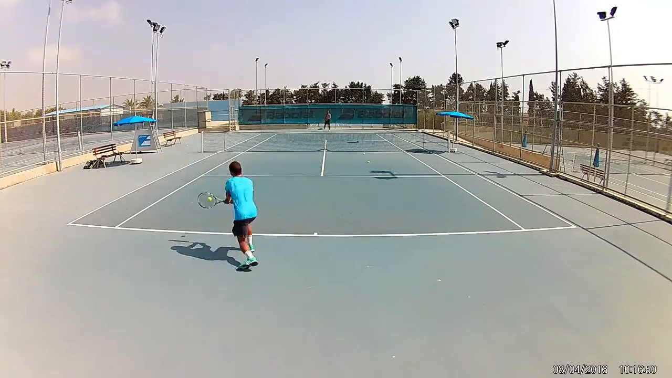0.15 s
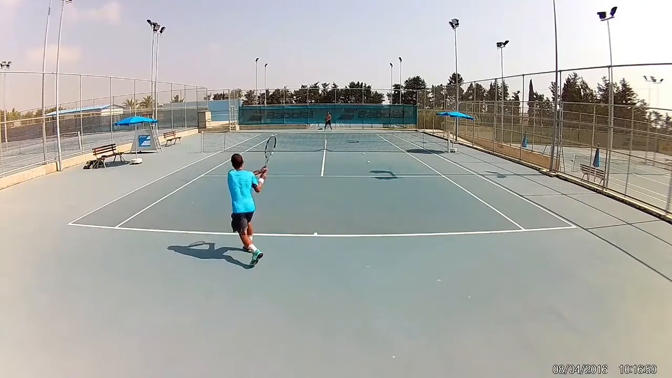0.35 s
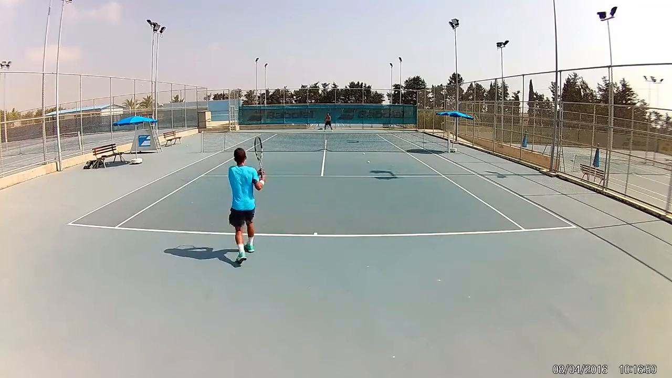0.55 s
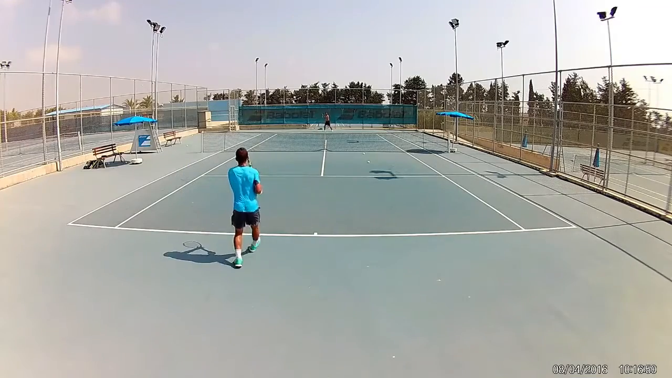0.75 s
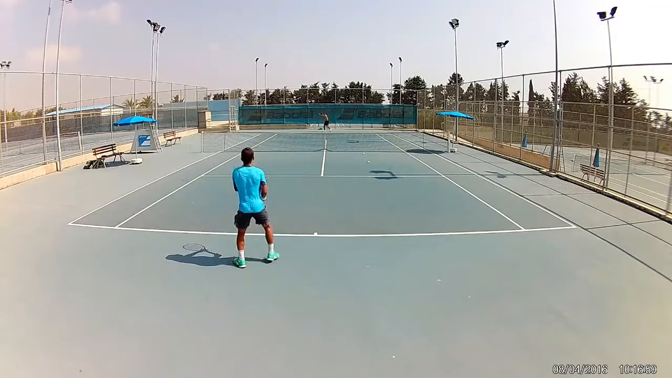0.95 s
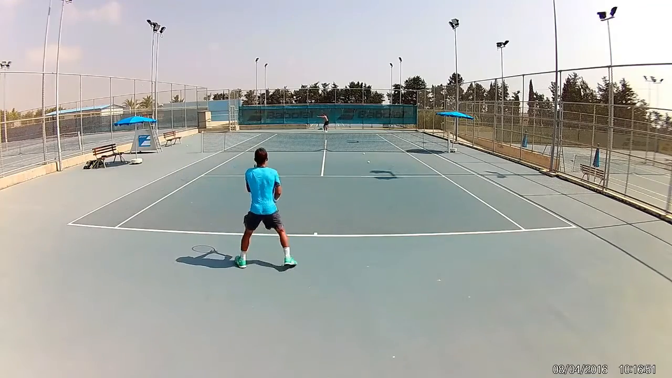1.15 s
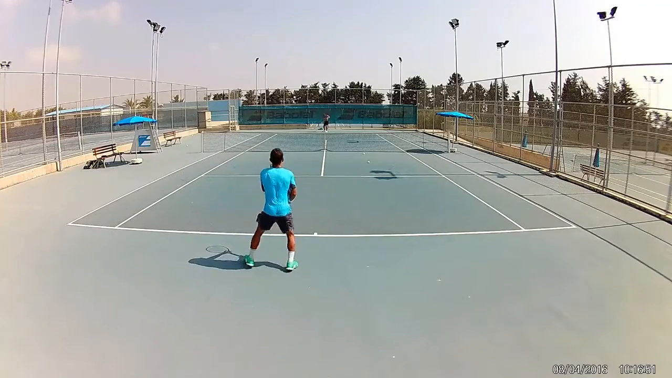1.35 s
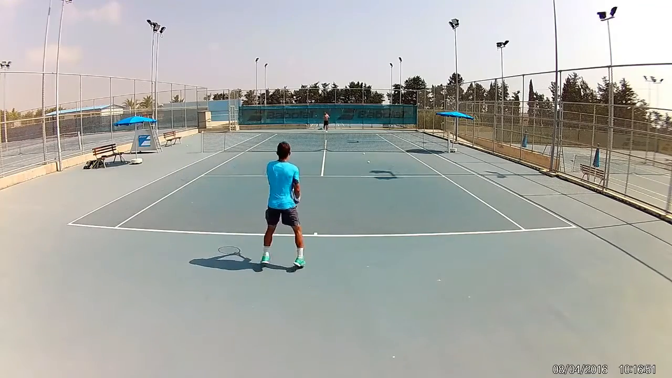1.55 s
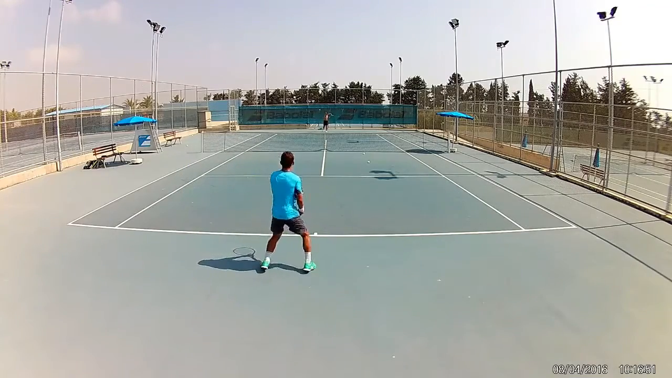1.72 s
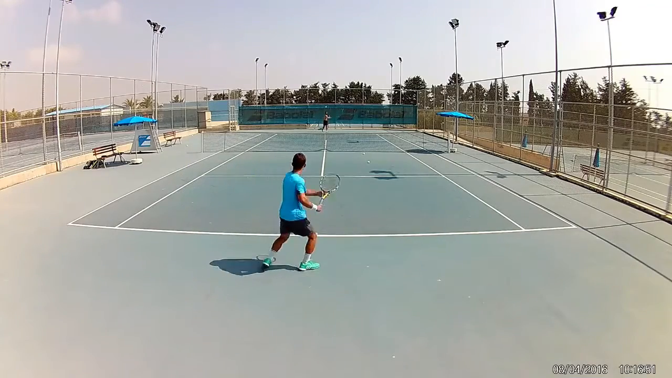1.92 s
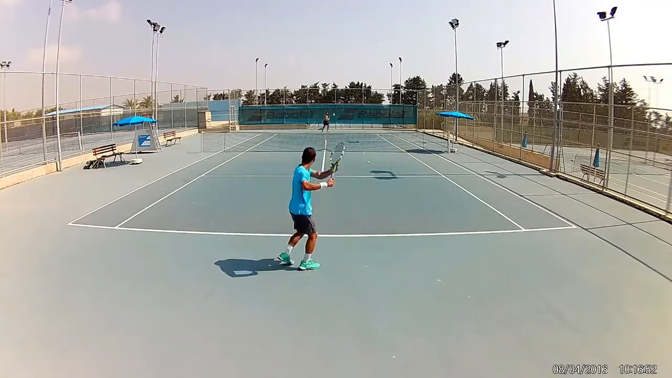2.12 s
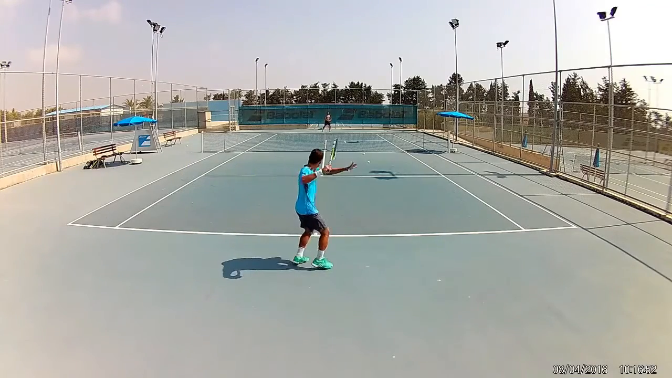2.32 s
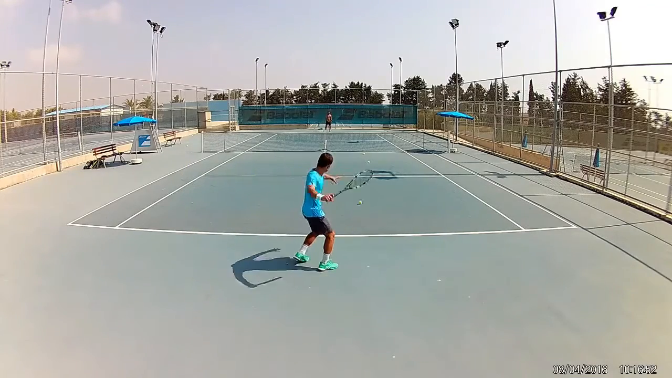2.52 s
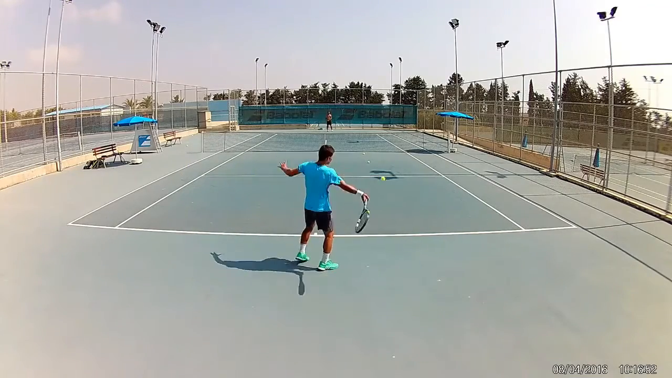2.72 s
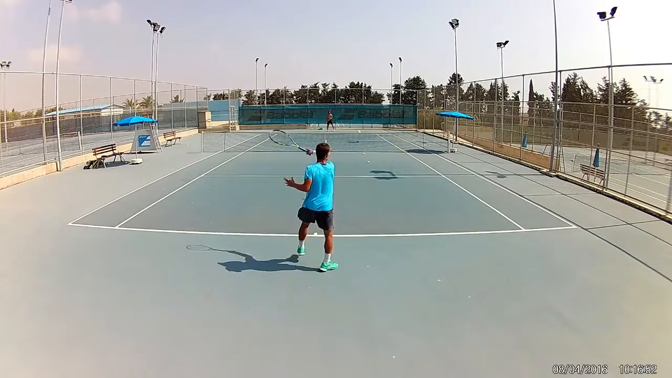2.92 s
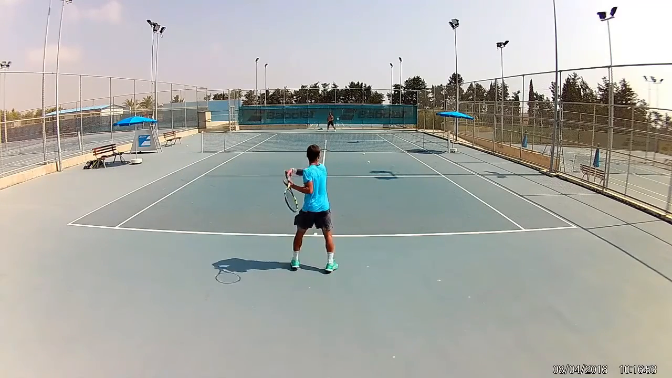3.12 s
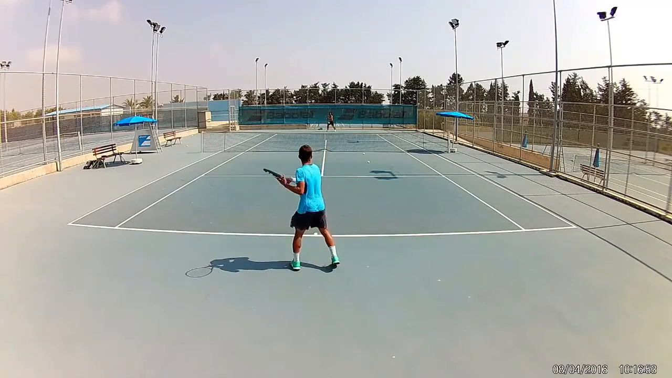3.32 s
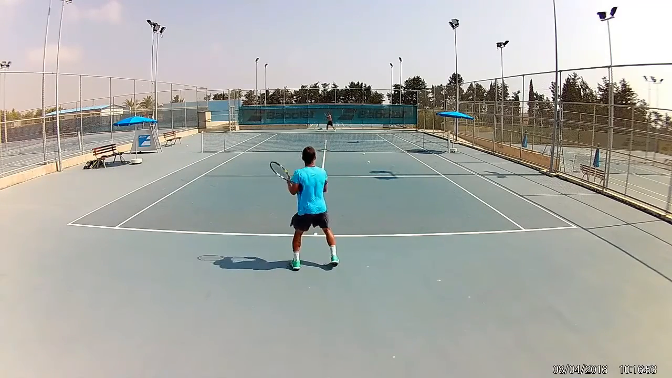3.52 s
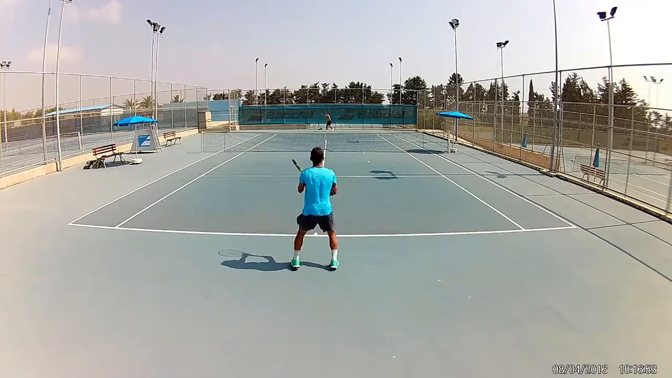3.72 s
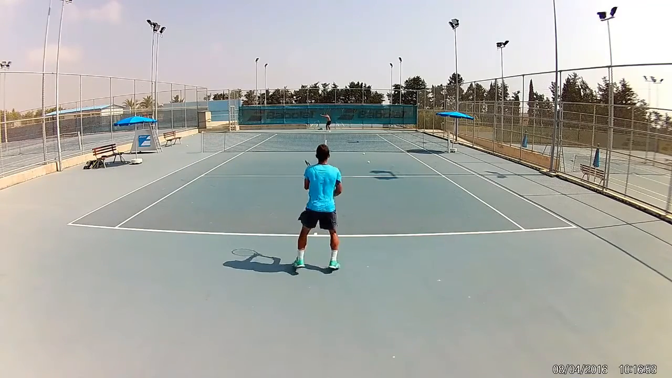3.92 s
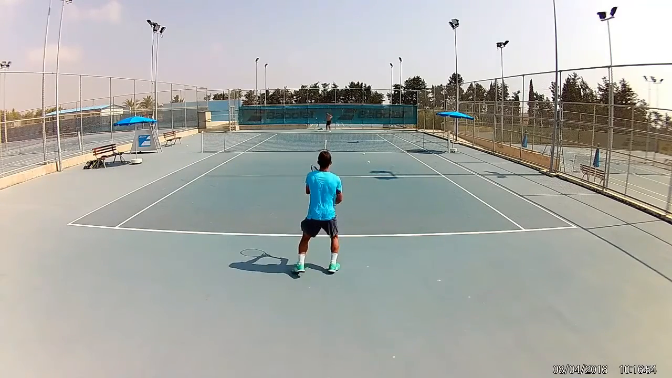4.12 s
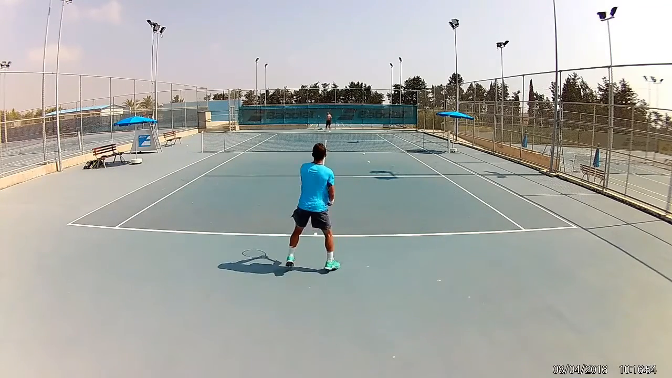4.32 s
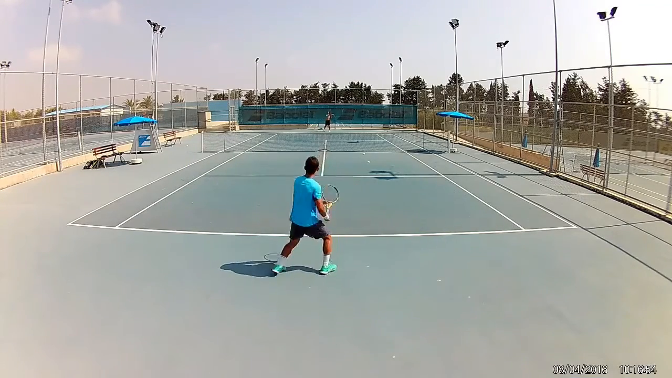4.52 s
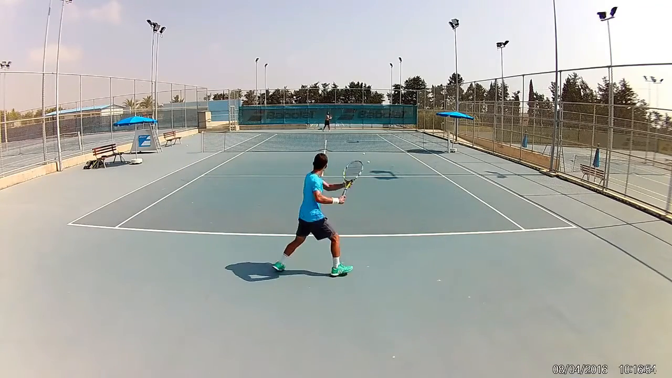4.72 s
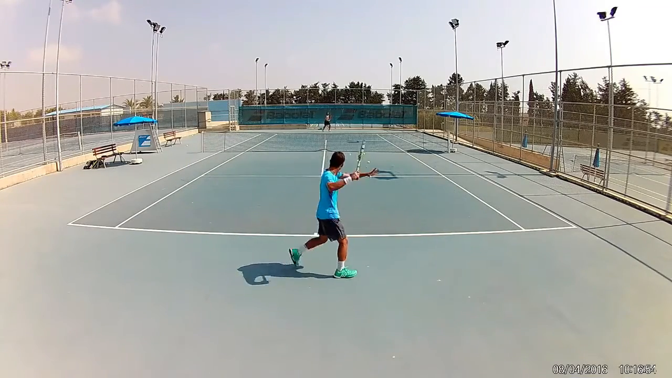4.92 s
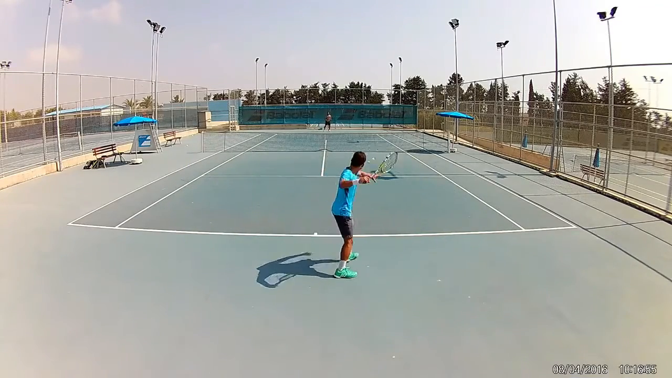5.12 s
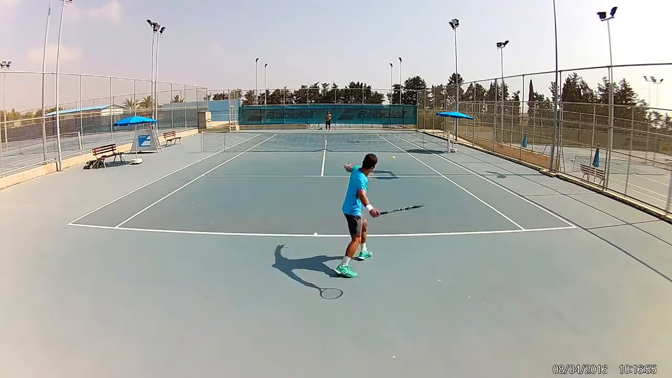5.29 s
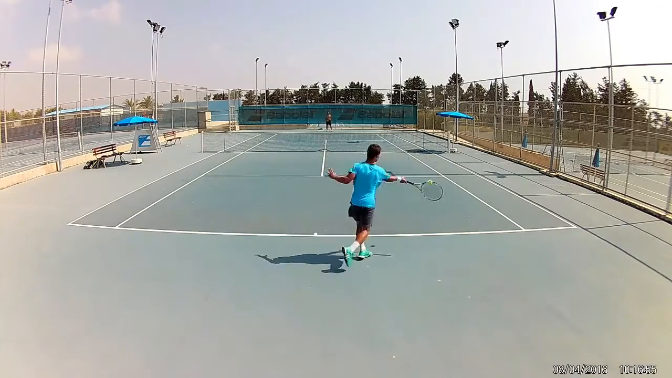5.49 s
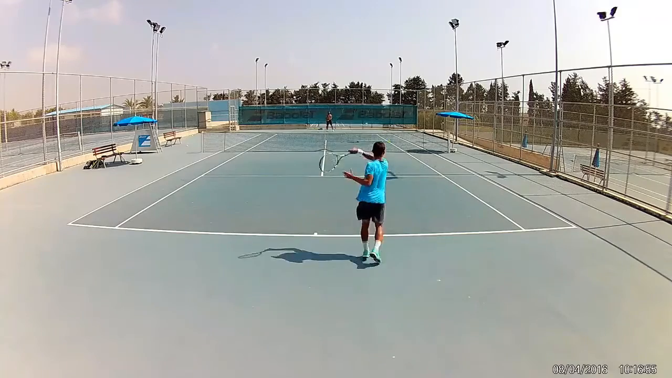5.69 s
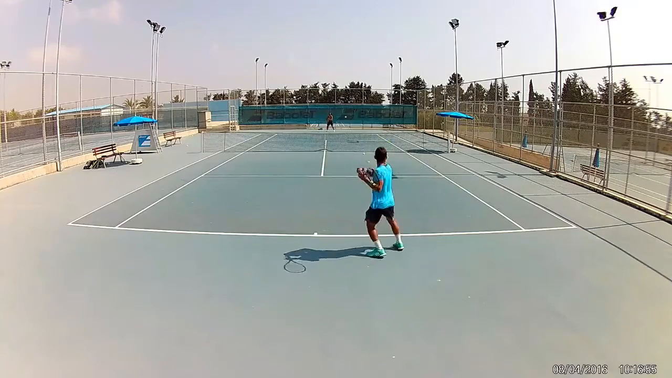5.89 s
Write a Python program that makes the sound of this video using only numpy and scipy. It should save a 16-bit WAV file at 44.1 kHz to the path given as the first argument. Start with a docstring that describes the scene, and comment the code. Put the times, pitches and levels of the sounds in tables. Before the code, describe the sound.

Rackets pop a tennis ball back and forth, close then distant, with bounces, faint shoe scuffs and wind on the microphone.

```python
"""A tennis rally on an outdoor hard court, heard from behind the near baseline.
Wind rumbles on a small hissing microphone; a shoe lands and scuffs, and the near player strikes.
The racket thumps, its strings ping, the hollow ball pops, and the ground and back wall reflect the sound.
The far player answers, duller with distance; the wind eases, shoes squeak and the ball bounces close by.
Three more strokes follow, near, far and near, with a second bounce before the last as the wind rises."""
import sys
import numpy as np
from scipy import signal
from scipy.fft import rfft, irfft
from scipy.io import wavfile
from scipy.ndimage import uniform_filter1d

SR = 44100
rng = np.random.default_rng(int(sys.argv[2]) if len(sys.argv) > 2 else 0)


def unload_wav(signal):
    """Save mono or channel-first audio to the path in sys.argv[1] as 16-bit WAV at rate SR, clipped to [-1, 1]."""
    wavfile.write(
        sys.argv[1],
        SR,
        np.round(np.clip(np.atleast_2d(signal).T, -1, 1) * 32767).astype(np.int16),
    )


N = 262395
T = np.arange(SR // 2) / SR  # time since an impact, t/s

NEAR_M, FAR_M = 5.7, 31  # from the microphone to the two baselines
# pairs: (at the near baseline, at the far baseline)
CRACK_DB, GROUND_DB, WALL_DB, COURT_DB = (-15, -30), (4.5, -16), (-17.5, -1.1), (-4.5, 0)
CUTOFF_HZ, WALL_DELAY_MS = (11500, 6400), (37.7, 39.2)

# racket impacts, near and far in turn: t/s, level/dB, distance/m, thump f/Hz, dwell t/ms, ball f/Hz,
# ball level/dB, string frequency ratio, string level/dB, tick f/Hz, tick level/dB, ground delay t/ms,
# lingering level/dB
RACKET_IMPACTS = [ (0.3484, -16, 7.1, 248, 5.6, 828, 7, 0.92, 0.5, 6430, -25.5, 1.25, 9),
                  (1.728, -16, 28.2, 456, 3.67, 1016, 3.5, .92, -16.5, 6330, -42, 4.1, -18),
                  (2.9675, -13.5, 5.26, 360, 3.21, 759, 4, .97, -5, 4260, -23.5, 2.85, 3),
                  (4.4683, -21.5, 29.6, 405, 2.99, 876, 5.5, 1.028, -4.5, 6300, -40, 2.43, -6),
                  (5.7260, -14.5, 5.46, 395, 3.2, 780, 4, 1.032, -0.5, 9700, -36.5, 2.263, 7.5)]

def strokes():
    """Impact excitation: the racket sounds, then the ball; far strokes are duller, with more wall echo."""
    out = np.zeros(N)
    for (start, db, metres, thump_hz, dwell_ms, ball_hz, ball_db, pitch, strings_db,
         tick_hz, tick_db, ground_ms, ring_db) in RACKET_IMPACTS:
        crack_db, ground_db, wall_db, wall_ms, court_db, cutoff_hz = (
            at_distance(metres, pair)
            for pair in (CRACK_DB, GROUND_DB, WALL_DB, WALL_DELAY_MS, COURT_DB, CUTOFF_HZ))
        racket = thump(thump_hz) + amp(strings_db) * strings(pitch)
        ball = amp(ball_db) * late(pop(ball_hz, t60=0.017, rise_s=0.00071), dwell_ms)
        body = racket + ball
        ground = amp(ground_db) * late(body, ground_ms)
        direct = body + ground + amp(crack_db) * crack() + amp(tick_db) * tick(tick_hz)
        # directivity: other directions get less of the ball's note and more of the crack
        backward = direct + amp(crack_db + 9) * band(crack(), [1200, 2800], "band")
        sideways = amp(4.5) * racket + amp(-0.5) * ball + amp(crack_db + 7.5) * crack()
        space = echoes(backward, wall_ms, wall_db) + amp(court_db) * scatter(sideways)
        ring = amp(ring_db) * lingering(ball_hz)
        add(out, start, amp(db) * band(direct + space + ring, cutoff_hz, "low"))
    return out


def thump(hz):
    """Dipole radiation: a bell-shaped contact force radiates its slope, one dip and one crest."""
    u = 2 * np.pi * hz * (T - .0022)
    return band(u * np.exp((1 - u ** 2) / 2), 175, "high")


def pop(hz, t60, rise_s):
    """Damped oscillation: a struck body rings as it springs back into shape."""
    return np.sin(2 * np.pi * hz * T) * fade(t60) * rise(rise_s)


# modes of string bed and frame: nominal f/Hz, level/dB, T60/s
RACKET_MODES = [(561, -1, 0.028), (1104, 3, 0.017), (1354, 0.5, 0.019), (1833, -8, 0.015),
                (1923, -19, 0.039), (2244, -20.5, 0.046), (2540, -23.5, 0.012), (3250, -33, 0.0066),
                (3560, -16, 0.0096)]

def strings(pitch):
    """Modal superposition: each mode, tuned by the ratio pitch, decays at its own rate."""
    modes = sum(amp(db) * np.sin(2 * np.pi * hz * pitch * T) * fade(t60) for hz, db, t60 in RACKET_MODES)
    return modes * rise(0.0012)


# spectrum of felt striking strings: f/Hz, relative level/dB
FELT_SPECTRUM = [(500, 7), (1800, 3.5), (3000, -3.5), (4100, -5.5), (5400, -17.5), (6900, -19.5),
                 (8000, -35), (9300, -29), (12000, -24.5), (15000, -33)]

def crack():
    """Contact noise: felt snaps against the strings in sharp ticks, then a duller rattle dies away."""
    ticks = amp(4 * noise([(100, 0), (900, 0), (2000, -30)], len(T)))
    snap = tint(ticks * rng.standard_normal(len(T)), FELT_SPECTRUM) * rise(0.0011) * fade(0.05)
    rattle = band(noise(FELT_SPECTRUM, len(T)), 7700, "low") * fade(0.11) * (T > .004)
    return amp(4) * snap + amp(-7.5) * rattle


def tick(hz, half_width=0.08, contact_s=0.0059):
    """Friction noise: a bright burst lasts only while the felt rubs the strings."""
    rub = rng.standard_normal(len(T))
    note = unit(band(rub, [hz * (1 - half_width), hz * (1 + half_width)], "band"))
    sparkle = unit(band(rub, [9000, 13200], "band", order=4))
    return (note + amp(-14) * sparkle) * np.sin(np.pi * np.minimum(T / contact_s, 1))


# ball landings on the near court: t/s, level/dB
LANDINGS = [(2.6902, -24.5), (5.1820, -30)]

def bounces():
    """Elastic rebound: on the hard court the ball rings higher and shorter, over a soft thud."""
    out = np.zeros(N)
    ring = pop(hz=1110, t60=0.012, rise_s=0.00051)
    direct = amp(6.5) * ring + amp(-3) * late(thump(hz=198), ms=0.81)
    slaps = echoes(ring, WALL_DELAY_MS[1], wall_db=-3)
    for start, db in LANDINGS:
        add(out, start, amp(db) * (direct + slaps + amp(-5) * scatter(direct)))
    return out


# spectrum of grit under a sole: f/Hz, relative level/dB
GRIT_SPECTRUM = [(1000, 8), (2200, 1), (3000, -4), (3700, -1), (4700, 5), (5400, -20), (7000, -7),
                 (8000, -22), (10500, -2), (14000, -25)]
# shoe scuffs and, in the last row, the final stroke's faint echo from the court's far end:
# t/s, level/dB, duration/s, grit f/Hz, squeak f/Hz, squeak level/dB
SCUFFS_AND_ECHO = [(0.253, -71.5, 0.16, 10100, 3600, -25), (0.759, -64, 0.035, 6900, 3500, -8),
                   (2.207, -53, 0.014, 2540, 3140, -16), (2.342, -50.5, 0.045, 2270, 3600, -25),
                   (2.377, -58.5, 0.025, 2200, 2670, 2), (2.514, -61, 0.026, 3460, 3600, -20),
                   (3.214, -55, 0.061, 3640, 4000, -9), (4.062, -59, 0.056, 2600, 3600, -20),
                   (5.408, -45.5, 0.033, 3460, 4100, -4), (5.427, -49.5, 0.028, 2500, 3630, 6.5),
                   (5.45, -54.5, 0.033, 2600, 3630, -2), (5.897, -62, 0.047, 4430, 4040, 0)]

def scuffs_and_echo(slip_db=3.5, pitch_spread=0.065):
    """Stick-slip friction: soles grind on grit and squeak; the last burst stands for a stroke's echo."""
    out = np.zeros(N)
    for start, db, length, grit_hz, squeak_hz, squeak_db in SCUFFS_AND_ECHO:
        push = np.sin(np.pi * np.minimum(T / length, 1) ** 0.78)
        slips = amp(slip_db * noise([(20, -14), (110, 0), (250, -6), (600, -40), (3000, -80)], len(T)))
        grains = tint(slips * rng.standard_normal(len(T)), GRIT_SPECTRUM)
        grit = unit(band(grains, [grit_hz * .5, grit_hz * 1.23], "band"))
        waver = 1 + pitch_spread * noise([(20, -10), (400, 3), (1200, -26)], len(T))
        tone = np.sin(2 * np.pi * np.cumsum(squeak_hz * waver) / SR)
        squeak = unit(band(slips * tone, 5000, "low", order=4))
        direct = push * (grit + amp(squeak_db) * squeak)
        add(out, start, amp(db) * (direct + echoes(direct, wall_ms=46, wall_db=-19)))
    return out


# footfalls: t/s, level/dB, slap level/dB
FOOTFALLS = [(0.119, -29, -33), (1.007, -46, -14), (1.295, -32.5, -20), (1.952, -32.5, -19),
             (3.648, -40, -30), (3.854, -43, -9), (4.695, -28, -29)]

def footsteps():
    """Damped impact: a shoe lands with a low thud and a slap of the sole."""
    out = np.zeros(N)
    thud = amp(7.5) * pop(hz=134, t60=0.024, rise_s=0.0029)
    for start, db, slap_db in FOOTFALLS:
        slap = unit(band(noise(COURT_SPECTRUM, len(T)), [500, 1500], "band")) * fade(0.11)
        add(out, start, amp(db) * (thud + amp(slap_db) * slap))
    return out


def echoes(x, wall_ms, wall_db):
    """Specular reflection: distinct slaps from the back wall, the side wall and the court's far end."""
    wall = amp(wall_db) * late(band(x, 11400, "low"), wall_ms)
    side = amp(-19) * late(band(x, 1070, "low"), ms=59.5)
    far_end = amp(-30) * late(x, ms=168)
    return wall + side + far_end


# spectrum of the court's scattered sound: f/Hz, relative level/dB
COURT_SPECTRUM = [(100, 4), (250, -2), (550, -2.5), (780, 0), (1020, -0.5), (1400, 3.5), (2000, -5.5),
                  (5000, -9), (12000, -9.5)]

def scatter(x):
    """Diffuse reflection: fences, benches and trees return clumps, strongest just after the wall's slap."""
    early = amp(-41) * fade(0.2) * (T > .008)
    behind = amp(-43) * late(fade(0.054), ms=37)
    distant = amp(-57) * fade(1.0) * rise(0.048)
    clumps = amp(2 * noise([(30, -11), (120, -14), (300, -41)], len(T)))
    response = noise(COURT_SPECTRUM, len(T)) * clumps * (early + behind + distant)
    return signal.fftconvolve(x, response)[:len(T)]


def lingering(ball_hz, doppler_ratio=1.207):
    """Doppler shift: the note is raised ahead of the flying ball, and the fences keep returning it."""
    note = pop(ball_hz * doppler_ratio, t60=0.021, rise_s=0.0016)
    fences = fade(0.97) * rise(0.012) + amp(-12) * late(fade(0.27), ms=180)
    return amp(-45.5) * signal.fftconvolve(note, rng.standard_normal(len(T)) * fences)[:len(T)]


# spectra of large eddies and of faster flutter: f/Hz, relative level/dB
EDDY_SPECTRUM = [(10, -4.5), (25, 1), (45, -4.5), (64, 3.5), (90, -5.5), (140, -5), (220, -28.5),
                 (400, -78)]
FLUTTER_SPECTRUM = [(60, -9.5), (130, -1), (200, 2), (320, -2), (500, -9), (900, -19), (2000, -62)]

def wind():
    """Turbulent pressure: eddies rumble on the microphone; the flutter grows more steeply with a gust."""
    rumble = noise(EDDY_SPECTRUM, N) * amp(-46.5 + gust() + walk(11))
    flutter = noise(FLUTTER_SPECTRUM, N) * amp(-52.5 + 1.43 * gust() + walk(25))
    return rumble + flutter


# wind strength at the microphone: t/s, level/dB
WIND_STRENGTH = [(0.0, -44.5), (0.48, -43.5), (1.19, -45.5), (2.29, -54.5), (2.52, -54), (3.15, -49),
                 (3.65, -50.5), (3.78, -49.5), (4.01, -50.5), (4.44, -49), (4.81, -51.5), (5.95, -46.5)]

def gust(breeze_db=-49):
    """Unsteady flow: the wind's excess over its usual breeze at each moment, in dB."""
    return np.interp(np.arange(N) / SR, *np.transpose(WIND_STRENGTH)) - breeze_db


# spectrum of the outdoor wash: f/Hz, relative level/dB
AMBIENT_SPECTRUM = [(100, -9.5), (500, -1.5), (1000, -0.5), (1350, -1), (1750, -11.5), (2350, -9),
                    (3000, -16.5), (3700, -24), (6000, -45.5)]

def outdoor_wash():
    """Ambient noise: a distant wash lifts a little with the wind."""
    return noise(AMBIENT_SPECTRUM, N) * amp(-57 + 0.27 * gust() + 0.45 * walk(2.24))


# spectrum of the camera's hiss: f/Hz, relative level/dB
HISS_SPECTRUM = [(1500, -3), (3700, -24.5), (4150, -3.5), (4550, 3.5), (5100, -7), (6100, -15),
                 (6850, -11.5), (7800, -25.5), (9300, -20), (12000, -22), (16000, -23)]
# tones of its electronics: f/Hz, rms level/dB
WHINE_TONES = [(12742, -90), (12818, -98)]

def electronics():
    """Self-noise: the camera adds a hiss whose peak wavers, and a thin whine."""
    hiss = noise(HISS_SPECTRUM, N) * amp(-64.5)
    waver = band(hiss, (4200, 4900), "band", order=1) * (amp(0.5 * walk(6)) - 1)
    whine = sum(amp(db) * np.sqrt(2) * np.sin(2 * np.pi * hz * np.arange(N) / SR) for hz, db in WHINE_TONES)
    return hiss + waver + whine


def at_distance(metres, near_far):
    """Logarithmic distance law: equal steps per doubling, from the near value to the far one."""
    near, far = near_far
    return near + (far - near) * np.log(metres / NEAR_M) / np.log(FAR_M / NEAR_M)


def amp(db):
    """Amplitude ratio of a level in dB."""
    return 10 ** (np.asarray(db) / 20)


def rise(seconds):
    """Exponential onset with the given time constant."""
    return 1 - np.exp(-T / seconds)


def fade(t60):
    """Exponential decay, by 60 dB in t60 seconds."""
    return np.exp(-np.log(1000) * T / t60)


def unit(x):
    """Normalisation to rms 1."""
    return x / np.sqrt(np.mean(x ** 2))


def tint(x, spectrum):
    """Spectral shaping through (f/Hz, level/dB) points, at rms 1."""
    hz, db = np.transpose(spectrum)
    f = np.maximum(np.arange(len(x) // 2 + 1) * SR / len(x), 1)
    gain = amp(np.interp(np.log(f), np.log(hz), db))
    return unit(irfft(rfft(x) * gain, len(x)))


def noise(spectrum, size):
    """Coloured Gaussian noise of rms 1."""
    return tint(rng.standard_normal(size), spectrum)


def band(x, hz, kind, order=2):
    """Butterworth filtering."""
    return signal.sosfilt(signal.butter(order, np.minimum(hz, SR / 2 - 1), kind, fs=SR, output="sos"), x)


def walk(rate_hz):
    """Slow random fluctuation of rms 1."""
    hold = int(SR / rate_hz)
    steps = np.repeat(rng.standard_normal(N // hold + 1), hold)
    return unit(uniform_filter1d(steps, hold)[:N])


def late(x, ms):
    """Propagation delay: the same sound over a longer path."""
    return np.concatenate([np.zeros(int(ms * SR / 1000)), x])[:len(T)]


def add(track, start, x):
    """Superposition: mix a sound in at start seconds."""
    i = int(start * SR)
    track[i:i + len(x)] += x[:max(N - i, 0)]


def scene():
    """Linear superposition of the rally and its background, in one channel."""
    rally = strokes() + bounces() + scuffs_and_echo() + footsteps()
    return (rally + wind() + outdoor_wash() + electronics())[None]


def record(dry, cutoff_hz=15800):
    """Band limiting: the camera cuts the top of the treble."""
    return signal.sosfilt(signal.ellip(10, .1, 70, cutoff_hz, fs=SR, output="sos"), dry)


dry = scene()
out = record(dry)
unload_wav(out)
```